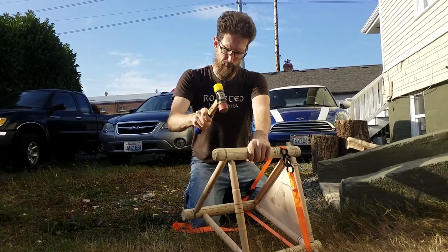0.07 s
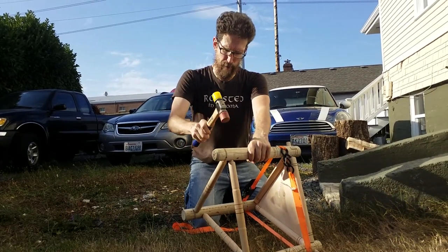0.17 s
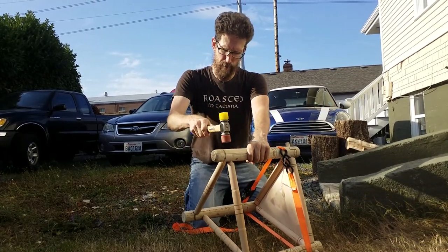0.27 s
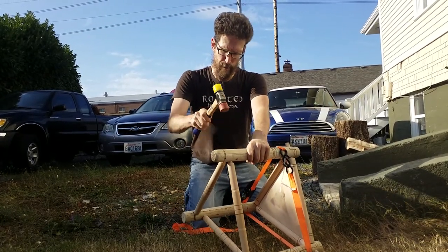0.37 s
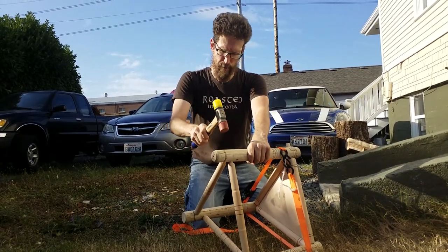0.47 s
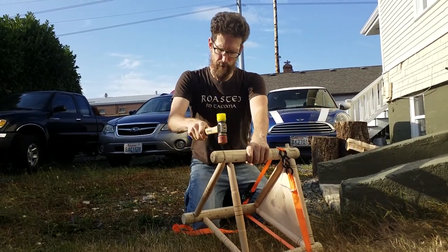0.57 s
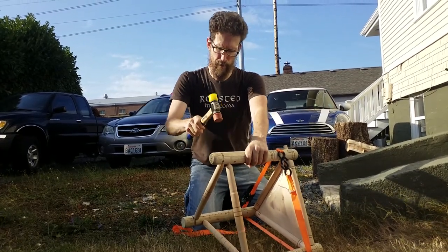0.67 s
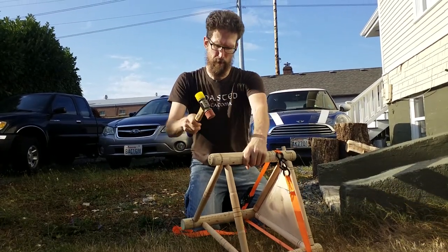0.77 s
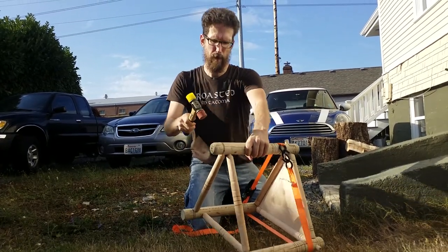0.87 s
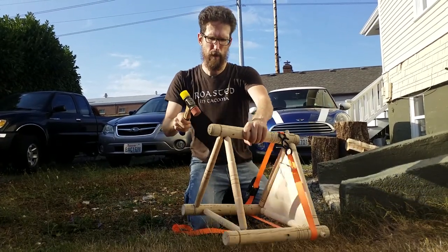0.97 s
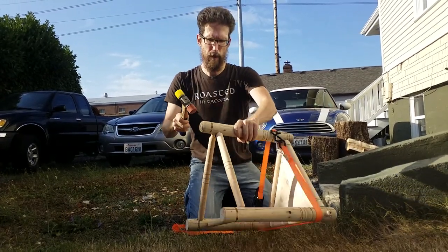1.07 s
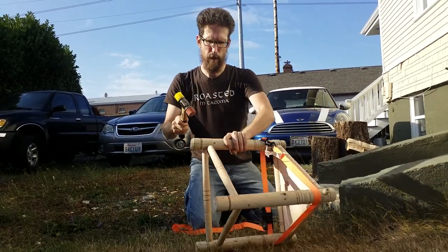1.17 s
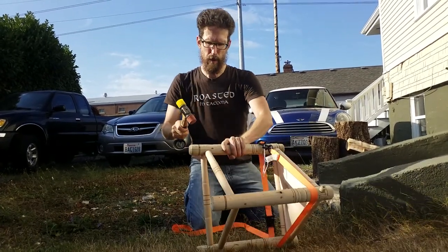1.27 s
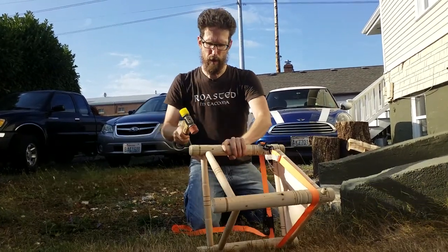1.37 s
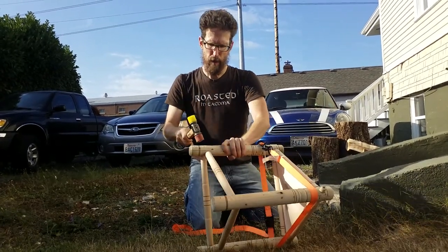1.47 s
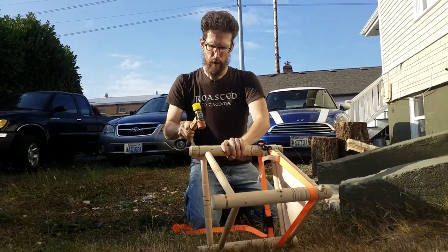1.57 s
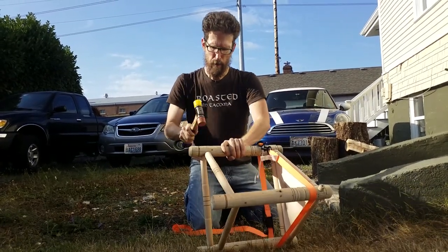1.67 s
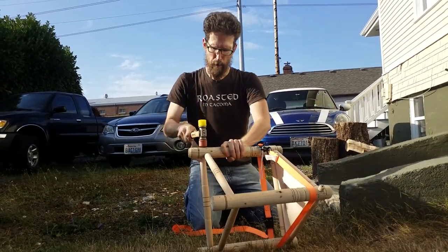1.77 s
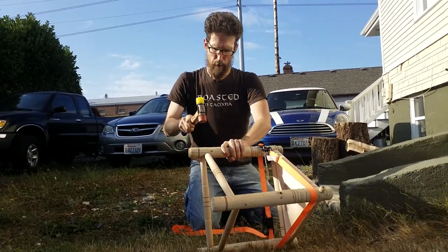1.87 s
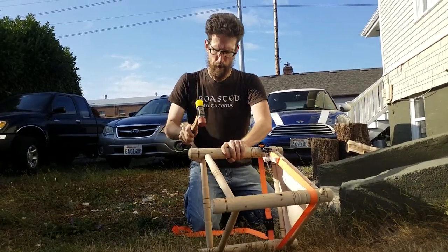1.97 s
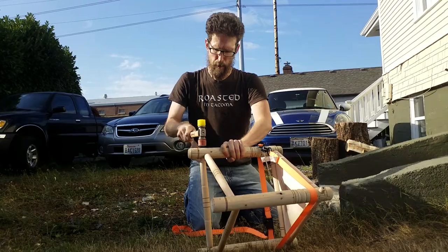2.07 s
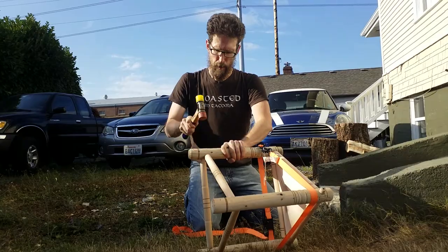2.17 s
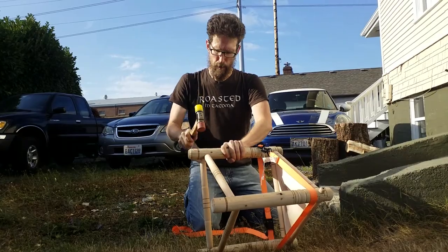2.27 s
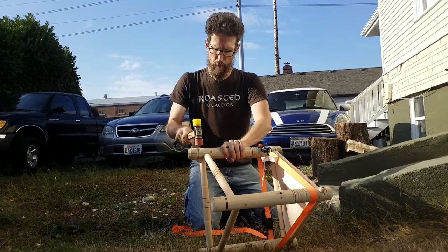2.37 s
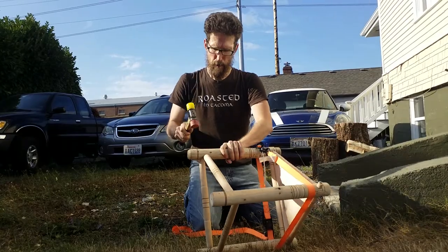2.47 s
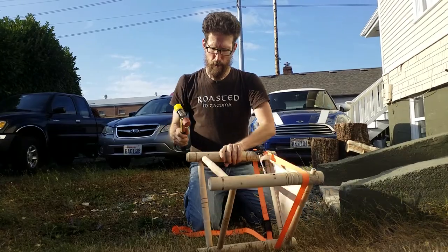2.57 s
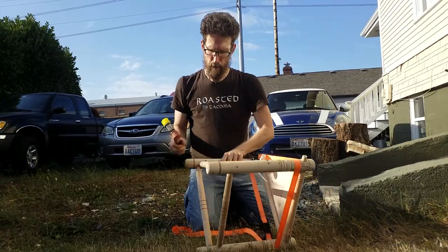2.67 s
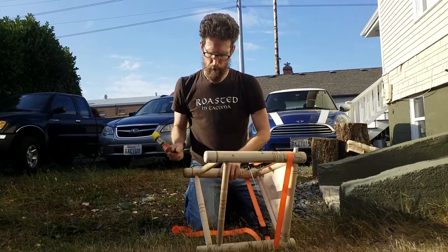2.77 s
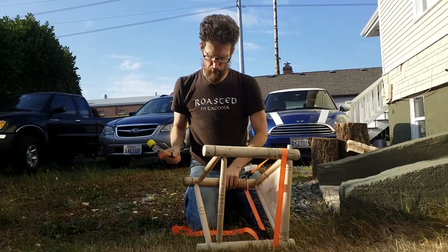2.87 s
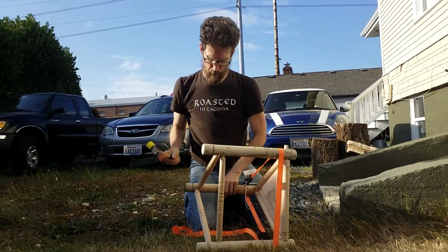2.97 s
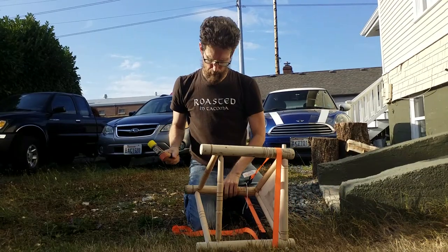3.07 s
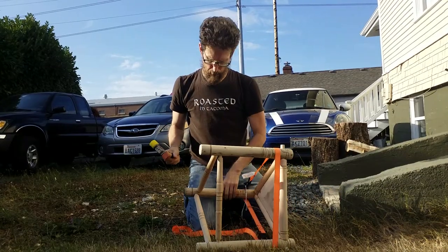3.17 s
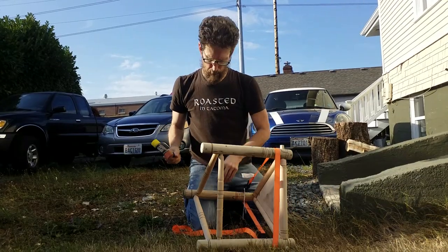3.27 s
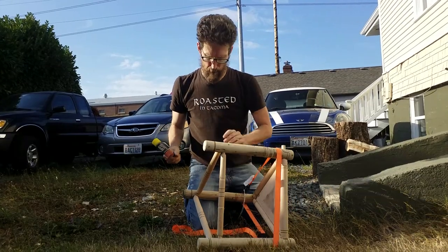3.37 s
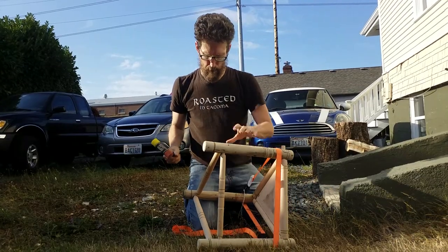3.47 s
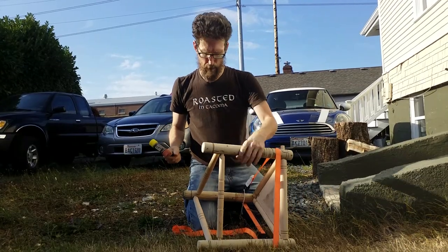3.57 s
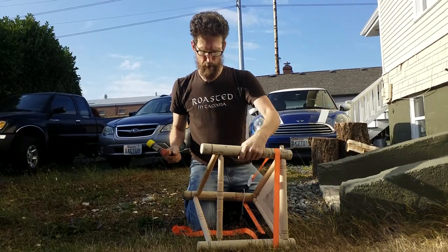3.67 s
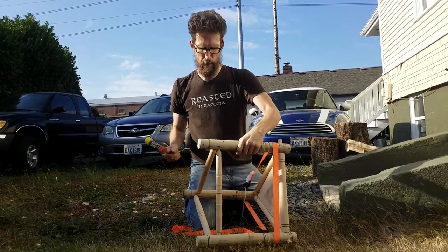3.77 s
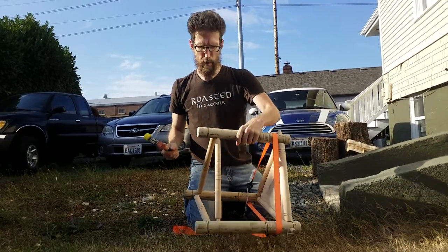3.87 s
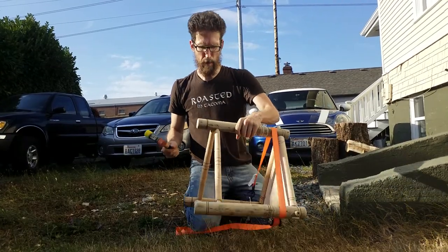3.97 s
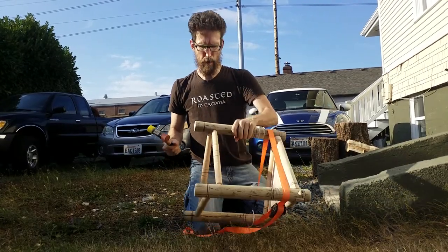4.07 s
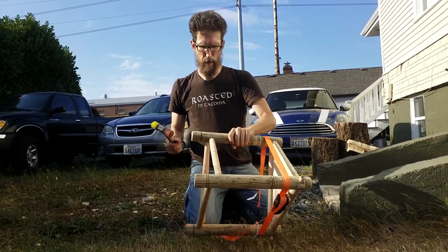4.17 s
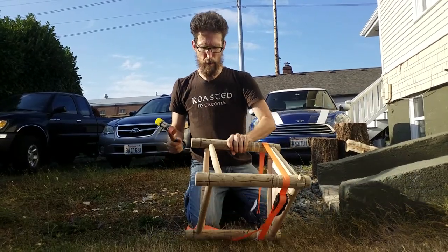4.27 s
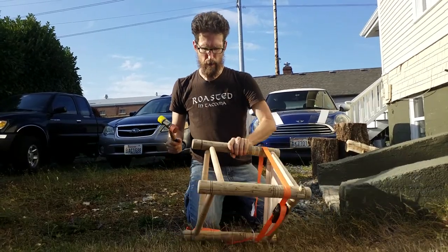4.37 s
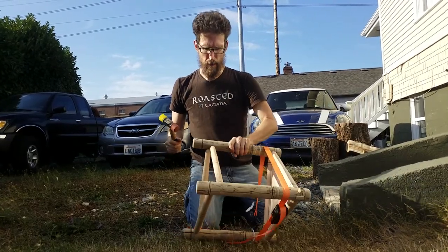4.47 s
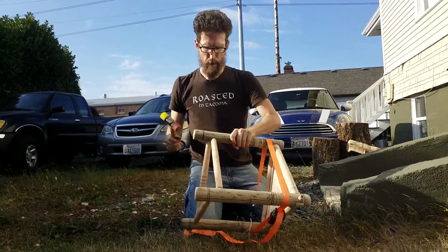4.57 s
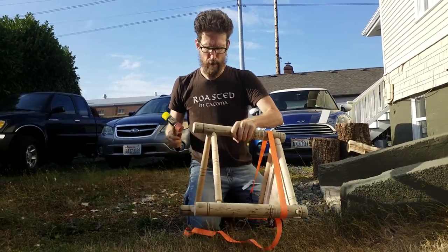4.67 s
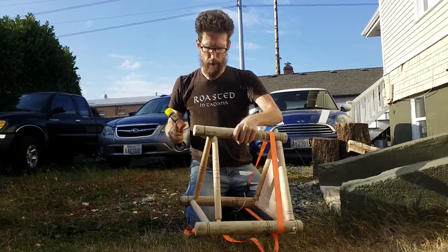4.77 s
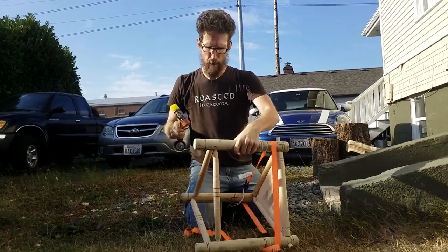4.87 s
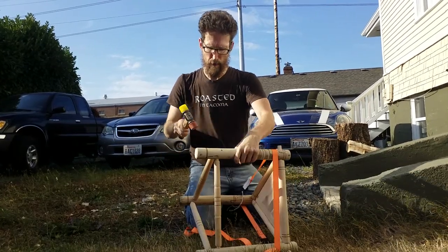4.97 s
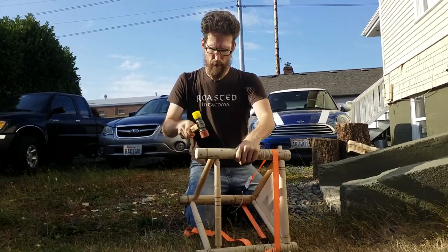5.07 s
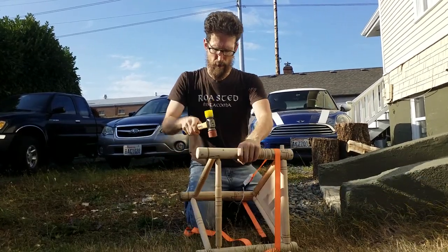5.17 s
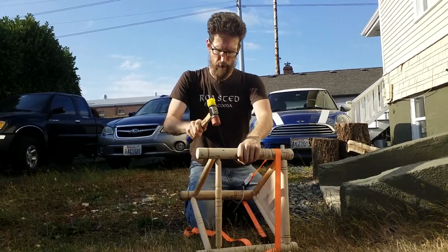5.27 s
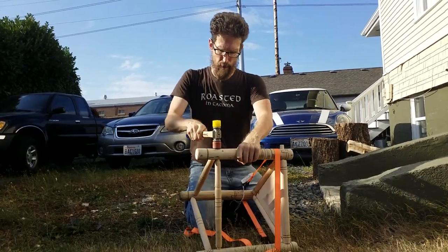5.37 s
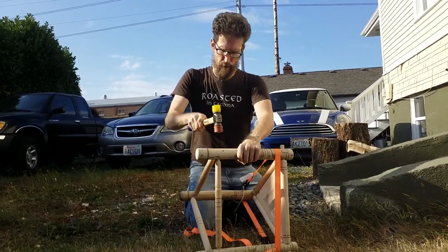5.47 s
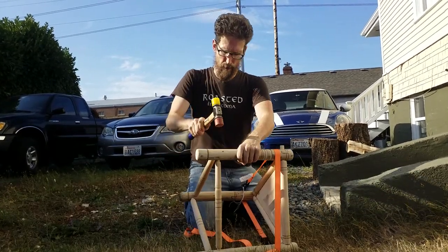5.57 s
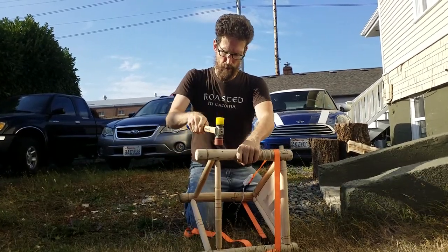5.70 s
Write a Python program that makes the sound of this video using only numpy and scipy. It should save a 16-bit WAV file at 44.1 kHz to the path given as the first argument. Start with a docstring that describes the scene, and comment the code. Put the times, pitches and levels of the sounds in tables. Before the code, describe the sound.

A soft-faced mallet knocks twice on a wooden stool frame, then three more times after a short gap. Each blow is a thump and clack with a tiny squeak and a quick echo off a wall. The stool is turned, rustling and bumping on the grass, while a nearby car engine's low hum swells. Two more knocks finish. It is an open yard, with light wind on the microphone.

```python
"""A car engine hums in a light wind, and almost at once a soft-faced mallet knocks on a wooden stool.
Each blow drives a joint home: the frame thumps, the joint clacks and squeaks as it slips,
and a house wall sends back an echo. Between blows the stool is turned over, rustling on the grass.
The engine's firings make a boom that swells and fades, along with a deep drone and a thin whistle."""
import sys
import numpy as np
from scipy import signal
from scipy.fft import rfft, irfft
from scipy.io import wavfile
from scipy.ndimage import uniform_filter1d

SR = 44100
rng = np.random.default_rng(int(sys.argv[2]) if len(sys.argv) > 2 else 0)


def digitize_waveform(pressure):
    """Quantize a signal to 16-bit integers and store it at the path in sys.argv[1].

    Rows of a 2-D input are taken as channels; values are limited to [-1, 1].
    """
    field = np.atleast_2d(pressure).T
    bounded = np.clip(field, -1, 1)
    quanta = np.round(bounded * 32767).astype(np.int16)
    wavfile.write(sys.argv[1], SR, quanta)


N = 252869

# Levels in the tables are relative: the functions add their own gains.
# how fast the engine fires: t/s, f/Hz
FIRING_RATE = [(0, 138), (.6, 136), (.9, 139.7), (1.2, 144.5), (1.8, 146.5), (2.7, 144.5), (3, 140.3),
               (3.4, 140.3), (4.2, 142.7), (5.73, 143)]
# low and higher exhaust tones, each with its own swell:
# multiple of the engine cycle, level/dB, swell t/s, swell height/dB
BOOM_TONES = [(5, -16.5, 6.3, 46), (7, -12, 5.26, 1), (8, -2, 2.93, 1.5), (10, -22, 0.33, 12.5)]
PIPE_TONES = [(12.92, -10.5, 4.5, 11.6), (13.89, -7.5, 4, 4.7), (14.83, -16.5, -0.43, 23.8),
              (15.86, -8.5, 3.5, 8.4), (16.78, -15.5, 4, 7.9), (18.65, -17, 2.5, 9.8),
              (19.91, -18.5, 4, 7.2), (20.86, -12, 3, 3.9)]
# loudness of the exhaust, the rush of fan and valves, and the drone: t/s, level/dB
BOOM_LOUDNESS = [(0.0, -32), (0.27, -36), (1.47, -41), (1.74, -50.5), (2.44, -56), (3.14, -29), (3.29, -22),
                 (3.51, -20.5), (4.33, -19.5), (4.85, -27.5), (5.34, -27), (5.73, -40.5)]
RUSH_LOUDNESS = [(0.0, -45.5), (0.43, -47.5), (0.57, -51), (0.91, -53.5), (1.71, -51), (2.03, -58),
                 (2.95, -49), (3.77, -40.5), (4.48, -43), (5.12, -46.5), (5.25, -46), (5.73, -49)]
DRONE_LOUDNESS = [(0.0, -28), (0.49, -34.5), (1.04, -42.5), (1.55, -39), (1.87, -50), (2.78, -55),
                  (3.78, -29.5), (4.02, -31), (5.11, -38.5), (5.38, -30), (5.73, -63)]
# tone colour of the fan and valves, the wind, and the wood's crack: f/Hz, level/dB
RUSH_COLOUR = [(60, -1), (110, 20), (200, 8), (350, 13.5), (470, 2.5), (600, 5.5), (820, 6), (1100, 0.5),
               (1500, -7.5), (2400, -16), (3050, -17), (3700, -22), (4400, -24.5), (6000, -30), (9000, -29),
               (12000, -33.5), (16000, -34)]
WIND_COLOUR = [(15, -7), (30, -9), (55, 6), (70, 0), (160, 5), (500, -57.5)]
CRACK_COLOUR = [(150, -7), (500, 9.5), (900, 0), (1400, -1), (2500, -0.5), (3300, -5), (4100, -9.5),
                (4900, -9.5), (6500, -13), (9000, -8.5), (12000, -14), (16000, -12.5)]
# gusts over the microphone: t/s, rise/s, fall/s, level/dB
WIND_GUSTS = [(.33, 0.61, 0.3, -39.5), (.95, 0.25, 0.39, -38.5), (1.65, .2, 0.26, -54),
              (3.7, 0.48, 0.74, -48.5), (4.9, 0.85, 1, -46.5)]
# tones the stool's frame rings at: f/Hz, level/dB, time to fade by 60 dB/s
FRAME_TONES = [(127.2, -10.5, 0.2), (198, -10.5, 0.13), (251.7, -2.5, 0.086), (330.6, -6, 0.036),
               (378.2, -9.5, 0.2), (467, 1.5, 0.026), (533, 2, 0.03), (580, -2, 0.043), (741, -10.5, 0.073),
               (774, -13.5, 0.08), (878, -16, 0.14), (1037, 0, 0.043), (1161, -4.5, 0.077),
               (1274, 11.5, 0.013), (1406, 0.5, 0.049), (1424, 1.5, 0.028), (1508, 0, 0.028),
               (1648, -8.5, 0.054), (1795, -5.5, 0.031), (2020, -15, 0.082), (2072, -11.5, 0.044),
               (2270, -10, 0.042), (2340, -9.5, 0.046), (2760, -18.5, 0.07), (2930, -21, 0.032),
               (3450, -11, 0.086), (4720, -1, 0.021), (5520, -18.5, 0.031), (6330, -5, 0.023)]
# mallet blows: t/s, strength/dB, thump/dB, crack/dB, snap/dB, rebound delay/s, rebound/dB,
# muffling/(dB/s), echo/dB, squeak level/dB, squeak f/Hz, amount of waver in the squeak
MALLET_BLOWS = [ (0.1724, -16, 13.5, -2.5, 1, 0.012, -9.5, 9, -0.5, -22.5, 8530, .2),
                (0.4610, -15, 12, -9.5, -8.5, 0.012, -14, 6, 1.5, -17.5, 9210, 0.14),
                (1.6766, -16.5, -5.5, -11.5, -8.5, .0118, 0.5, 2, 0.5, -19.5, 9330, 0.26),
                (1.9714, -19, -6, -3, -0.5, 0.0053, 7, 450, -5, -37, 8230, 0.22),
                (2.2618, -17.5, -7.5, -4.5, -7, .0044, 7.5, 548.5, -5, -34.5, 8470, 0.49),
                (5.3005, -13, 2.5, -7, -0.5, .0124, -1, 108, -1.5, -30, 9200, 0.67),
                (5.5740, -16, -1.5, -8, 2.5, 0.012, 7, 100, -3, -28, 9370, 0.38), ]
# sleeves, strap and grass brushing the stool: t/s, rise/s, fall/s, level/dB
BRUSHES = [(0.66, 0.05, 0.038, -52.5), (0.80, 0.074, 0.1, -55), (1.17, 0.073, 0.094, -51.5),
           (3.22, 0.41, 0.072, -62.5), (3.51, 0.012, 0.049, -49), (3.9, 0.43, 0.56, -55),
           (4.35, 0.043, 0.012, -37), (4.50, 0.09, 0.06, -52.5), (4.88, 0.057, 0.033, -39.5),
           (5.085, 0.042, 0.027, -45.5)]
# the stool rolling over on the ground: t/s, rise/s, fall/s, level/dB
ROLLS = [(0.87, 0.019, 0.039, -27), (1.03, 0.088, 0.097, -29), (1.27, 0.027, 0.042, -37.5)]
# the stool bumping down: t/s, strength/dB, thump/dB, crack/dB, snap/dB
GROUND_BUMPS = [(4.35, -32, 5, -1.5, -1), (4.892, -26.5, 5.5, -3.5, 1)]
# dry stalks snapping: t/s, level/dB
STALK_SNAPS = [(4.4096, -28), (4.541, -39), (4.637, -43)]

T = np.arange(N) / SR  # the time of every sample, in seconds


def undb(db):
    """Turn decibels into a number to multiply by."""
    return 10 ** (np.asarray(db) / 20)


def curve(rows):
    """Join (time, value) points with straight lines, giving a value at every sample."""
    return np.interp(T, *np.transpose(rows))


def fade(t, t60):
    """Die away, 60 dB down after t60 seconds."""
    return np.exp(-np.log(1000) * t / t60)


def colour(points, hz):
    """Read the gain at each frequency from an outline of (f/Hz, level/dB) points."""
    f, db = np.transpose(points)
    return undb(np.interp(np.log(hz + 1), np.log(f), db))


def noise(points, size, apart_hz=5000):
    """Coloured stereo noise of strength 1; left and right agree well below apart_hz and differ above."""
    hz = np.arange(size // 2 + 1) * SR / size
    mid, side = rfft(rng.standard_normal((2, size))) * colour(points, hz)
    side = side * hz / np.hypot(hz, apart_hz)
    x = irfft(np.array([mid + side, mid - side]), size)
    return x / x.std()


def wobble(rate):
    """A smooth random wobble, about 1 in size, with rate new values a second."""
    hold = int(SR / rate)
    steps = np.repeat(rng.standard_normal(N // hold + 1), hold)
    return 1.7 * uniform_filter1d(uniform_filter1d(steps, hold), hold)[:N]


def add(out, s, x):
    """Mix x into out, starting at s seconds."""
    i = int(s * SR)
    out[:, i:i + x.shape[1]] += x[:, :N - i]


def swells(rows):
    """A loudness curve made of smooth rises and falls."""
    return sum(undb(db) * np.exp(-((T - s) / np.where(T < s, rise, fall)) ** 2)
               for s, rise, fall, db in rows)


def exhaust(cycles, tones, flutter_db, jitter_rad, lead_rad=0.048):
    """Tones at multiples of the engine cycle; uneven burning shakes their level and timing."""
    out = 0
    for multiple, db, swell_s, swell_db in tones:
        swell = swell_db * np.exp(-((T - swell_s) / 0.75) ** 2)
        gain = undb(db + swell + flutter_db * wobble(14))
        phase = 2 * np.pi * multiple * cycles + jitter_rad * wobble(13)
        out = out + np.sqrt(2) * gain * np.sin([phase - lead_rad, phase + lead_rad])
    return out


def engine():
    """Firings make the boom; unequal pipes add higher tones, which grow as the fan and valves rush."""
    cycles = np.cumsum(curve(FIRING_RATE)) / SR / 8  # eight firings a cycle
    boom_db, rush_db = curve(BOOM_LOUDNESS), curve(RUSH_LOUDNESS)
    pipes_db = -28.5 + 1.336 * (rush_db - rush_db.max())
    boom = undb(boom_db + 3) * exhaust(cycles, BOOM_TONES, flutter_db=1.3, jitter_rad=0.12)
    pipes = undb(pipes_db) * exhaust(cycles, PIPE_TONES, flutter_db=2.5, jitter_rad=0.49)
    rush = undb(rush_db + 7.5 + 0.93 * wobble(15)) * noise(RUSH_COLOUR, N, apart_hz=2350)
    return boom + pipes + rush


def drone(hz=86.2):
    """A deep drone wavers around one pitch while it swells and fades."""
    phase = 2 * np.pi * hz * T + 0.49 * wobble(12)
    lead = 0.05 + 0.1 * wobble(3.6)  # puts left and right slightly out of step
    gain = undb(curve(DRONE_LOUDNESS) - 0.5 + 1.2 * wobble(4.8))
    return np.sqrt(2) * gain * np.sin([phase - lead, phase + lead])


def wind():
    """Light gusts rumble over the microphone's openings."""
    strength = undb(-80.5) + swells(WIND_GUSTS)  # calm air plus gusts
    return strength * undb(7.5 + 1.1 * wobble(9.7)) * noise(WIND_COLOUR, N, apart_hz=70)


def frame_ring(t, force):
    """The frame rings at its own tones, a little differently wherever it is struck."""
    hz, db, t60 = np.transpose(FRAME_TONES)[:, :, None]
    size, detune, direction = rng.standard_normal((3, len(FRAME_TONES), 1))
    signs = (-1) ** np.arange(len(FRAME_TONES))[:, None]  # every other tone starts the opposite way
    gain = undb(db + 0.47 * size) * colour(force, hz) * signs
    phase = 2 * np.pi * hz * (1 + 0.0087 * detune) * t
    lead = hz / 7000 * (0.26 + direction)  # short waves reach left and right out of step
    ring = [np.sum(gain * np.sin(phase + side * lead) * fade(t, t60), axis=0) for side in (1, -1)]
    return np.array(ring) * (1 - np.exp(-t / 0.0033))


def crack(t, force):
    """Countless tones of the wood blur into noise, gone in a few hundredths of a second."""
    hz = np.arange(len(t) // 2 + 1) * SR / len(t)
    ring = irfft(rfft(noise(CRACK_COLOUR, len(t))) * colour(force, hz), len(t))
    return ring * fade(t, 0.045) * (1 - np.exp(-t / 0.00032))


def contact(t, db, thump_db, crack_db, snap_db):
    """One hit rings the wood; the shape of its force sets the bass and the treble."""
    force = [(315, db + thump_db),  # f/Hz, level/dB
             (683, db - 2 + 0.18 * thump_db),  # a dip, filled in by a heavy thump
             (1257, db),  # the clack
             (5100, db + crack_db), (12100, db + snap_db)]
    return undb(-1.5) * frame_ring(t, force) + undb(4) * crack(t, force)


def knocks():
    """Mallet blows, then bumps on the ground. Returns the direct sound and the sound sent to the yard."""
    direct, to_yard = np.zeros((2, 2, N))
    t = np.arange(SR // 3) / SR
    for blow in MALLET_BLOWS:
        s, db, thump_db, crack_db, snap_db, rebound_s, rebound_db, muffle_db_per_s, echo_db = blow[:9]
        hand = undb(-muffle_db_per_s * t)  # the steadying hand muffles the ring
        # the blow, then the frame bouncing back into its joint with less snap
        for delay_s, gain_db, dull_db in ((0, 0, 0), (rebound_s, rebound_db, -14)):
            knock = hand * contact(t, db + gain_db, thump_db, crack_db, snap_db + dull_db)
            add(direct, s + delay_s, knock)
            add(to_yard, s + delay_s, undb(echo_db) * knock)
    for s, *force_db in GROUND_BUMPS:
        bump = contact(t, *force_db)
        add(direct, s, bump)
        add(to_yard, s, bump)
    return direct, to_yard


def joint_squeaks():
    """A peg slips in its hole at each blow and, more softly, at the rebound: a short, shaky chirp."""
    out, t = np.zeros((2, N)), np.arange(SR // 10) / SR
    envelope = fade(t, 0.017) * (1 - np.exp(-t / 0.00027))
    pitch_rise = 1 - 0.058 * np.exp(-t / 0.00051)
    for s, *_, rebound_s, _, _, _, db, hz, waver in MALLET_BLOWS:
        for delay_s, slip_db in ((0, 0), (rebound_s, -7)):
            slips = uniform_filter1d(rng.standard_normal(len(t)), 30)
            phase = 2 * np.pi * np.cumsum(hz * (pitch_rise + waver * slips)) / SR
            chirp = np.array([np.sin(phase), np.cos(phase)])  # left and right a quarter wave apart
            add(out, s + delay_s, undb(db + slip_db + 5.5) * chirp * envelope)
    return out


def yard_echo(x, scatter_db, scatter_t60, wall_db, wall_s=0.052, wall_t60=0.024):
    """Ground, steps and parked cars scatter the sound; the house wall sends back a smeared echo."""
    t = np.arange(SR // 2) / SR
    scatter_colour = [(100, 14), (1000, 9), (4500, 9.5), (9000, 4), (16000, 2.5)]
    scatter = noise(scatter_colour, len(t), apart_hz=2520)
    scatter *= fade(t, scatter_t60) * np.clip((t - 0.003) / 0.0027, 0, 1)
    wall_colour = [(200, -0.5), (950, 1.5), (1350, 8.5), (1750, 4), (2400, 2.5), (9000, -6),
                   (16000, -0.5)]
    wall = noise(wall_colour, len(t), apart_hz=2490)
    wall *= fade(np.abs(t - wall_s), wall_t60) * (t > wall_s)
    response = sum(undb(db) * echo / np.sqrt(np.sum(echo ** 2) / 2)
                   for echo, db in ((scatter, scatter_db), (wall, wall_db)))
    return signal.fftconvolve(x, response, axes=1)[:, :N]


def turning_stool():
    """Turning the stool makes grainy swishes, dull scuffs on the ground and a few snapping stalks."""
    brush_colour = [(500, 14), (2000, 2.5), (3600, -2.5), (4400, -3), (6000, -6.5), (9200, 5),
                    (11500, 0), (16000, 3)]
    scuff_colour = [(40, -35), (110, -0.5), (190, -0.5), (300, -7), (500, -24), (2000, -69), (8000, -82)]
    snap_colour = [(4000, -25), (8000, -10), (12000, 4), (16000, -16)]
    out = noise(brush_colour, N, apart_hz=3060) * swells(BRUSHES) * undb(1.9 * wobble(330))
    out += noise(scuff_colour, N) * swells(ROLLS)
    t = np.arange(SR // 20) / SR
    for s, db in STALK_SNAPS:
        add(out, s, undb(db) * noise(snap_colour, len(t)) * fade(t, 0.0063))
    return out


def whistle():
    """A thin, fluttering whistle near 3 kHz sounds over the engine and sinks in pitch."""
    glide_hz = np.interp(T, [2.4, 3, 3.9, 4.6], [3260, 3080, 2980, 2610])
    hz = glide_hz + 110 * wobble(250) + 20 * wobble(12)
    phase = 2 * np.pi * np.cumsum(hz) / SR
    tone = np.sqrt(2) * np.sin([phase, phase + 2.76 * wobble(300)])
    flutter = undb(1.5 * wobble(40))
    loudness = swells([(2.55, 0.32, 0.96, -71.5), (4.09, 0.57, 0.044, -51.5), (4.4, 0.9, 0.31, -55)])
    return flutter * tone * loudness


def scene():
    """Mix the stool and its echoes with the engine and the open air."""
    direct, to_yard = knocks()
    squeaks = joint_squeaks()
    echoes = yard_echo(to_yard, scatter_db=-13, scatter_t60=0.27, wall_db=-20)
    echoes += yard_echo(squeaks, scatter_db=-3, scatter_t60=0.2, wall_db=-35)
    return direct + squeaks + echoes + turning_stool() + engine() + whistle() + drone() + wind()


def record(dry, ring_hz=9150, width_hz=1700, ring_db=12, top_hz=16000):
    """The microphone's openings ring in the high treble; loud peaks are rounded and the top is cut."""
    ring = signal.lfilter(*signal.iirpeak(ring_hz, ring_hz / width_hz, fs=SR), dry)
    rounded = np.tanh(dry + undb(ring_db) * ring)
    return signal.sosfilt(signal.ellip(8, 0.2, 80, top_hz, fs=SR, output="sos"), rounded)


dry = scene()
out = record(dry)
digitize_waveform(out)
```